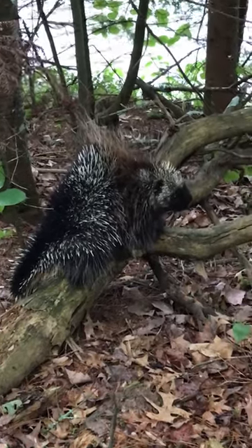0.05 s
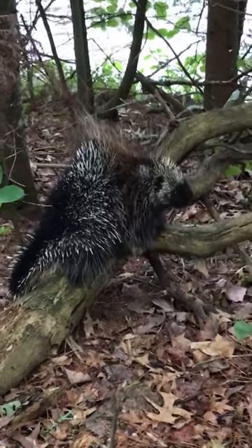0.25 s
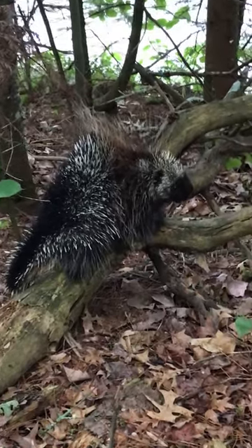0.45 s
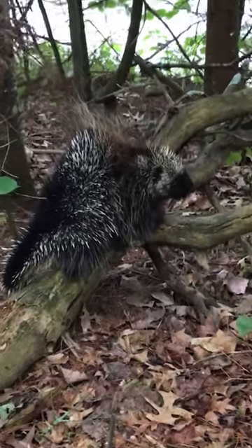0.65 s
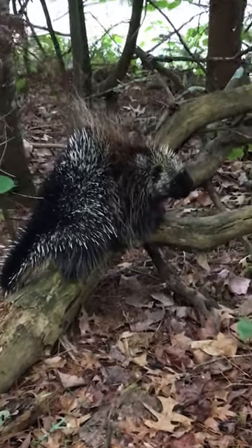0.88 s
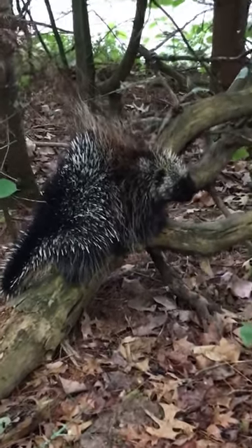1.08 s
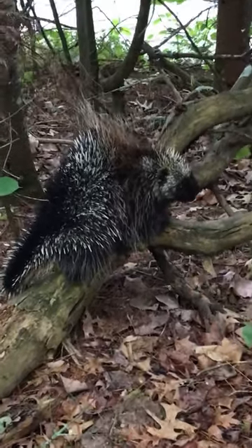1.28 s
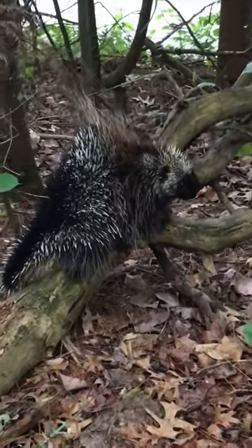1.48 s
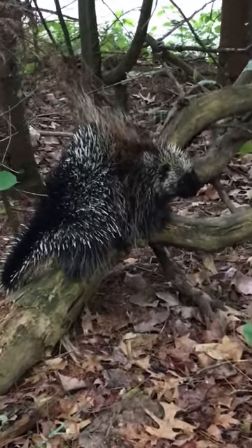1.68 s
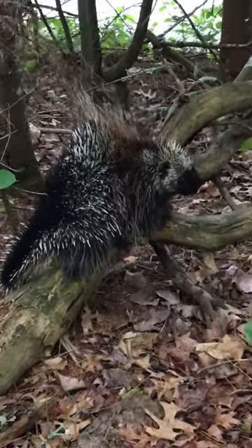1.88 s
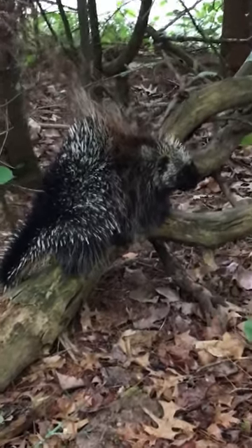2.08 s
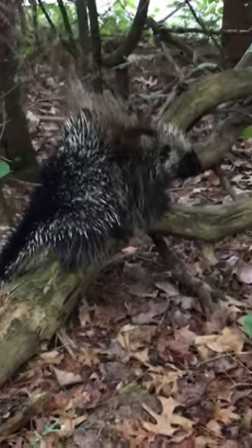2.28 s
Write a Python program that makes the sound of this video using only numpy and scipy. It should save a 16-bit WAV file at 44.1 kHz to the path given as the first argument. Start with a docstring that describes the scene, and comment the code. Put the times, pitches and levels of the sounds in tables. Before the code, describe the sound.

Light wind buffets a hand-held microphone in a quiet wood, first with a short low thump, then with weaker rumbles over a steady soft hiss. Toward the end a twig ticks twice and dry leaves barely stir.

```python
"""An even hiss of distant foliage and microphone noise: a quiet wood, heard from a hand-held camera.
Puffs of wind buffet the microphone with turbulent pressure, and the strongest eddies thump it.
The leaf litter stirs faintly, and near the end a dry twig ticks twice as its fibres give way."""
import sys
import numpy as np
from scipy import signal
from scipy.fft import rfft, irfft, next_fast_len
from scipy.io import wavfile
from scipy.ndimage import uniform_filter1d, map_coordinates

SR = 44100
rng = np.random.default_rng(int(sys.argv[2]) if len(sys.argv) > 2 else 0)


def store_pcm(level_fs):
    """Save levels as 16-bit WAV."""
    pcm = np.round(np.clip(level_fs, -1, 1) * 32767).astype(np.int16)
    wavfile.write(sys.argv[1], SR, np.atleast_2d(pcm).T)


N = 108045


def amp(db):
    """Amplitude grows tenfold for every 20 dB."""
    return 10 ** (np.asarray(db) / 20)


def unit(x):
    """Normalisation to an rms of 1."""
    return x / np.sqrt(np.mean(x ** 2) + 1e-20)


def filtered(x, response):
    """A linear filter multiplies the spectrum by its frequency response."""
    size = next_fast_len(N + 8192)
    return irfft(rfft(x, size) * response(np.fft.rfftfreq(size, 1 / SR)), size)[:N]


def noise(spectrum):
    """Filtering colours white noise to follow (Hz, relative dB) points; the rms is 1."""
    corner_hz, db = np.transpose(spectrum)
    white = rng.standard_normal(N)
    return unit(filtered(white, lambda hz: amp(np.interp(np.log(hz + 1), np.log(corner_hz + 1), db))))


def hiss(level_db=-51.5):
    """Distant foliage and microphone noise add incoherently to a steady broadband hiss."""
    # Each row: frequency in Hz, relative spectral density in dB.
    spectrum = [(30, -19), (60, 10), (110, -6.5), (280, 0.5), (430, -6.5), (720, -4.5), (1100, -2.5),
                (2000, -5), (3300, -6), (4400, -7.3), (4900, -11), (6500, -11.5), (7700, -16.5),
                (9300, -18), (10400, -24.5), (11700, -23), (15600, -29)]
    return amp(level_db) * noise(spectrum)


def swell(crest, rise, fall):
    """A Gaussian envelope, down to 1/e at rise seconds before its crest and fall seconds after."""
    t = np.arange(N) / SR
    return np.exp(-((t - crest) / np.where(t < crest, rise, fall)) ** 2)


def turbulence(spectrum, window_samples):
    """Random pressure, divided by its own smoothed envelope so that its strength holds steady."""
    pressure = noise(spectrum)
    power = uniform_filter1d(np.abs(signal.hilbert(pressure)) ** 2, window_samples)
    return unit(pressure / np.sqrt(np.abs(power) + 1e-6))


def wind(breeze_db=-56, rumble_gain_db=1.42, flutter_gain_db=1.5):
    """Turbulence on the microphone rumbles and flutters; puffs and a steady breeze add in power."""
    # Each row is a puff: crest, rise and fall in seconds, then rumble and flutter in relative dB.
    puffs = [(.04, 0.17, 0.072, -49.5, -54), (.22, 0.025, 0.052, -40, -42),
             (0.257, 0.013, 0.043, -33, -32.5), (0.311, 0.033, 0.023, -26, -35),
             (.41, 0.021, 0.033, -47, -72), (0.496, 0.017, 0.028, -48, -40),
             (0.579, 0.05, 0.011, -35.5, -41.5), (0.619, 0.025, 0.018, -32, -44.5),
             (0.801, 0.03, 0.037, -49.5, -52.5), (1.088, 0.033, 0.028, -43.5, -50),
             (1.18, 0.064, 0.055, -40.5, -42), (1.309, 0.049, 0.036, -33.5, -39),
             (1.47, 0.1, 0.095, -48, -71), (1.688, 0.046, 0.066, -49.5, -48.5),
             (1.845, 0.018, 0.021, -36.5, -66), (1.944, 0.071, .018, -45, -49.5),
             (2.04, 0.046, 0.11, -45.5, -55), (2.163, 0.024, 0.039, -36.5, -49.5),
             (2.282, 0.0092, 0.019, -43, -49.5), (2.373, 0.023, 0.026, -44, -50.5)]
    # The microphone's response to slow and to fast turbulence. Each row: frequency in Hz, relative dB.
    rumble_spectrum = [(15, -50), (28, -24), (45, -4), (63, 3.5), (85, -5), (140, -13), (220, -23),
                       (350, -39.5), (700, -84)]
    flutter_spectrum = [(50, -36), (110, 13), (170, -8.5), (290, -11), (400, -19.5), (700, -34.5),
                        (1200, -59)]
    rumble_envelope, flutter_envelope = np.full(N, amp(breeze_db)), np.zeros(N)
    for crest, rise, fall, rumble_db, flutter_db in puffs:
        force = swell(crest, rise, fall)
        rumble_envelope = np.hypot(rumble_envelope, amp(rumble_db) * force)
        flutter_envelope = np.hypot(flutter_envelope, amp(flutter_db) * force)
    rumble = rumble_envelope * turbulence(rumble_spectrum, window_samples=1300)
    flutter = flutter_envelope * turbulence(flutter_spectrum, window_samples=600)
    return amp(rumble_gain_db) * rumble + amp(flutter_gain_db) * flutter


def eddies(reach_widths=2.58, low_cut_hz=45.4):
    """A passing eddy sucks, then pushes; the shorter this pressure pulse, the brighter its thump."""
    # Each row: centre in seconds, peak in dB before the microphone's low cut, width in seconds.
    thumps = [(.2470, -32.5, 0.00047), (0.2507, -29.5, .0008), (0.279, -28.5, 0.00124),
              (0.2904, -17.5, 0.00061), (.294, -20.5, 0.0014), (0.492, -28.5, 0.0021), (.540, -30, 0.0013),
              (.610, -27, 0.0018), (1.01, -30, 0.0026), (1.177, -25.5, 0.0016), (1.304, -24.5, 0.0016),
              (1.3212, -25, 0.0009), (1.354, -28, 0.0014), (1.713, -31, 0.0033), (1.834, -26.5, 0.0076),
              (1.944, -26, 0.0052), (2.119, -31, 0.0016)]
    t, pressure = np.arange(N) / SR, np.zeros(N)
    for centre, db, width in thumps:
        offset = (t - centre) / width
        pulse = offset / (1 + (offset / reach_widths) ** 2) ** 6
        pressure += amp(db) * pulse / pulse.max()
    return filtered(pressure, lambda hz: (1j * hz / (low_cut_hz + 1j * hz)) ** 2)


def wobble(rate):
    """Spline interpolation joins random knots, rate of them a second, into a smooth curve."""
    knots = rng.standard_normal(int(N * rate / SR) + 4)
    return map_coordinates(knots, [np.arange(N) * rate / SR])


def leaves(crackle_db=3):
    """Dry leaves shift briefly; fast random amplitude modulation makes their rustle grainy."""
    # Each row is a stirring of the litter: crest in seconds, half length in seconds, level in dB.
    stirs = [(.382, .006, -64), (2.271, 0.014, -61), (2.3065, .0015, -55), (2.317, 0.0078, -64)]
    # Each row: frequency in Hz, relative spectral density in dB.
    spectrum = [(1500, -23), (4000, 6), (7000, 7), (9200, 2), (10500, -5), (12000, -7), (16000, -14)]
    grains = unit(noise(spectrum) * amp(crackle_db * wobble(rate=900)))
    return grains * sum(amp(db) * swell(crest, half, half) for crest, half, db in stirs)


def twig(fibres=3, gap_s=.0003, step_db=-1, detune=0.051):
    """Fibres give way in quick succession, each impulse exciting the twig's heavily damped modes."""
    # Each row: start in seconds, rms level in dB with the tick's energy spread over one millisecond.
    ticks = [(2.1664, -36), (2.3005, -47.5)]
    # Each row: frequency in Hz, relative level in dB, time to decay by 60 dB in seconds.
    twig_modes = [(3700, -21, 0.0017), (5300, -3, 0.003), (6660, 2, 0.0016), (9000, -1, 0.0028),
                  (12100, -3.5, 0.0023), (14700, -5, 0.0021)]
    t, track = np.arange(SR // 50) / SR, np.zeros(N + SR)
    for start, db in ticks:
        tick = np.zeros(len(t))
        for fibre in range(fibres):
            age = np.maximum(t - gap_s * (fibre + rng.uniform(0, 0.52)), 0)
            for hz, mode_db, t60 in twig_modes:
                envelope = amp(mode_db - step_db * fibre - 60 * age / t60)  # later fibres are louder
                detuned_hz = hz * np.exp(detune * rng.normal())
                tick += envelope * np.sin(2 * np.pi * detuned_hz * age)
        millisecond_rms = np.sqrt(np.sum(tick ** 2) / (SR / 1000))
        track[round(start * SR):][:len(t)] += amp(db) * tick / millisecond_rms
    return track[:N]


def scene():
    """Superposition: all the sources add at the one microphone."""
    return (hiss() + wind() + eddies() + twig() + leaves())[None]


def record(dry):
    """The camera is a low-pass filter, tapering over 600 Hz to silence at its band limit."""
    limit_hz = 16200
    return filtered(dry[0], lambda hz: np.clip((limit_hz - hz) / 600, 0, 1))[None]


dry = scene()
out = record(dry)
store_pcm(out)
```